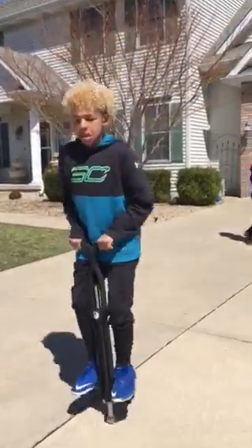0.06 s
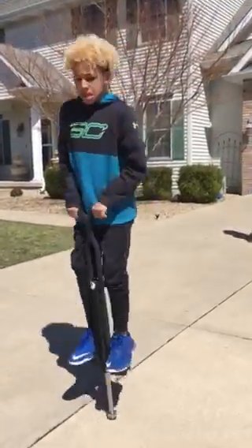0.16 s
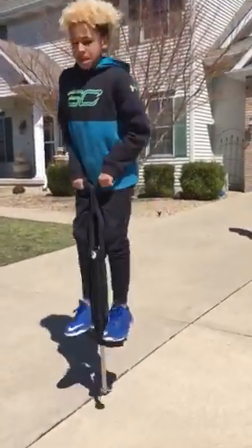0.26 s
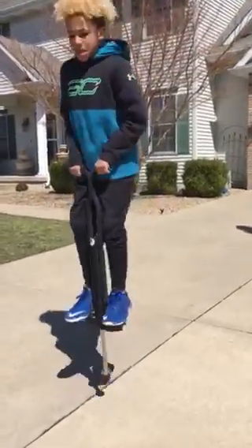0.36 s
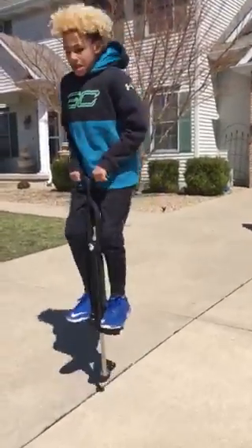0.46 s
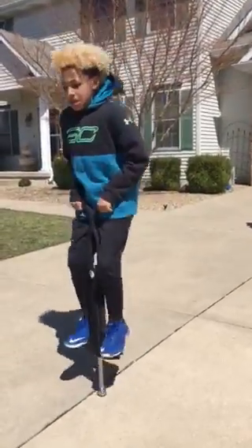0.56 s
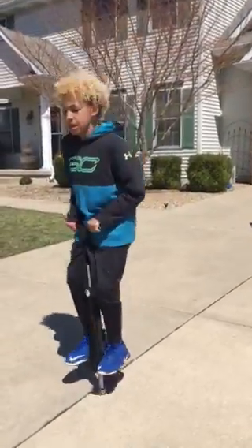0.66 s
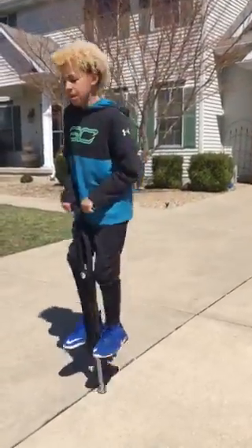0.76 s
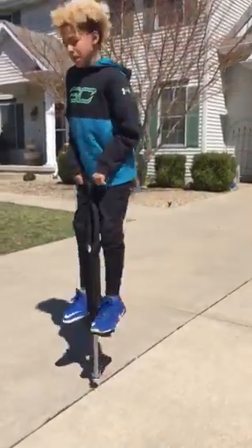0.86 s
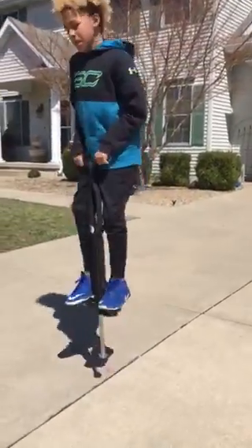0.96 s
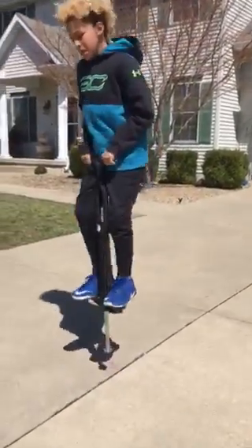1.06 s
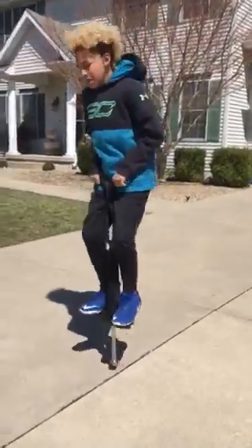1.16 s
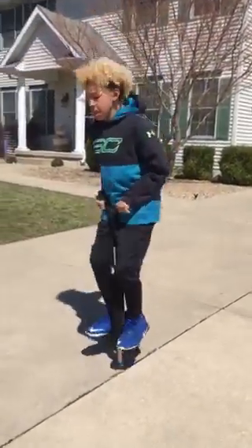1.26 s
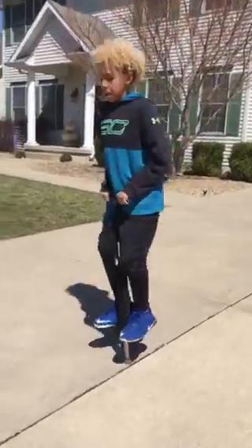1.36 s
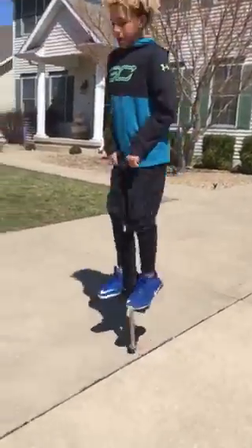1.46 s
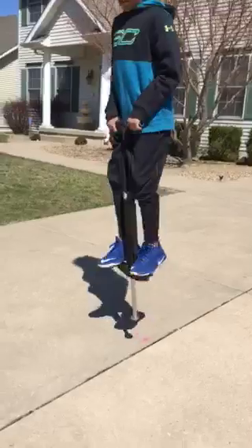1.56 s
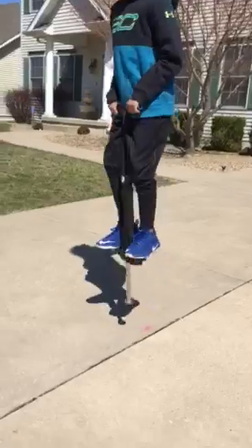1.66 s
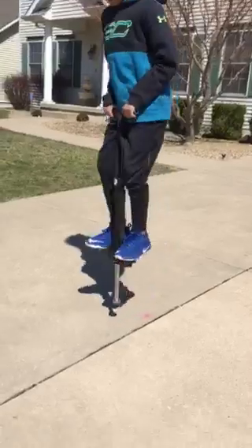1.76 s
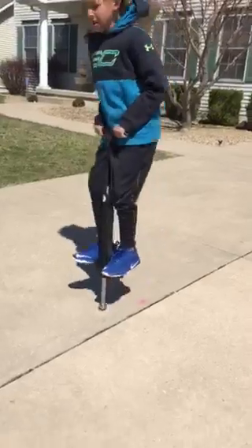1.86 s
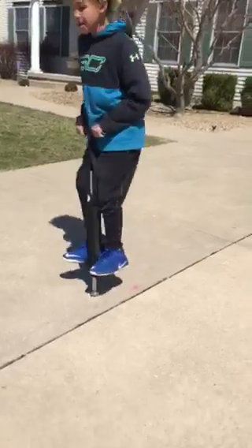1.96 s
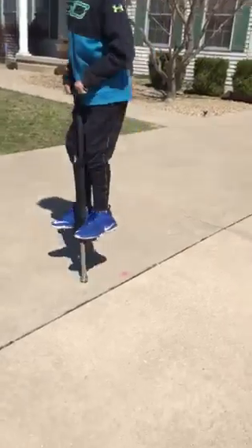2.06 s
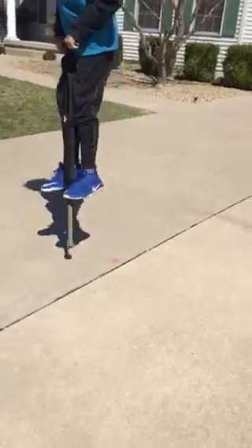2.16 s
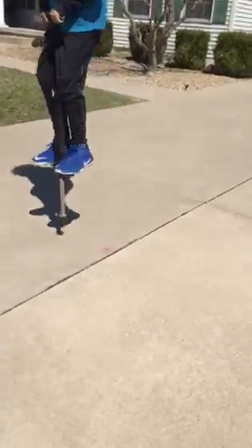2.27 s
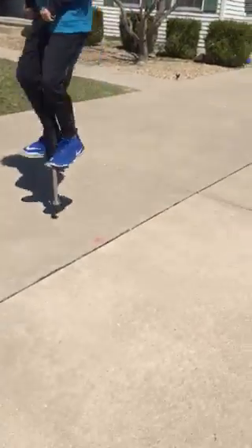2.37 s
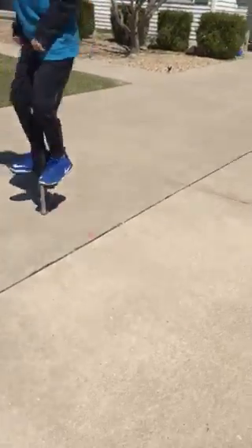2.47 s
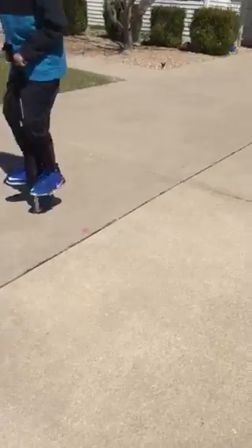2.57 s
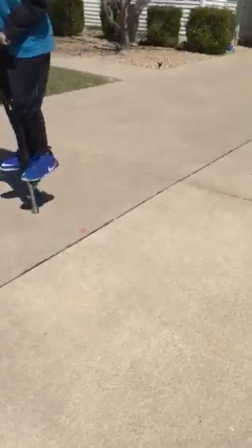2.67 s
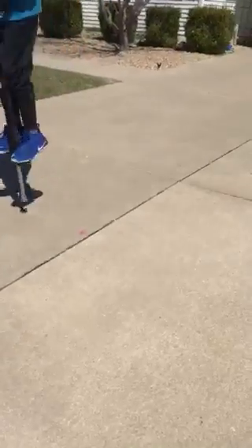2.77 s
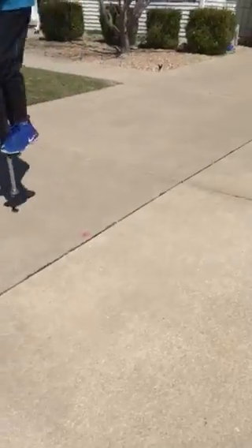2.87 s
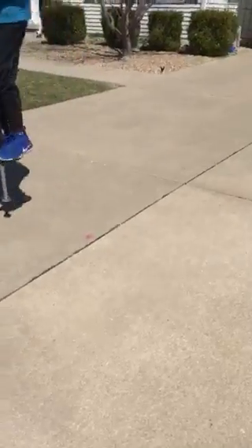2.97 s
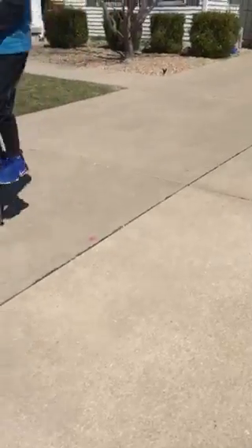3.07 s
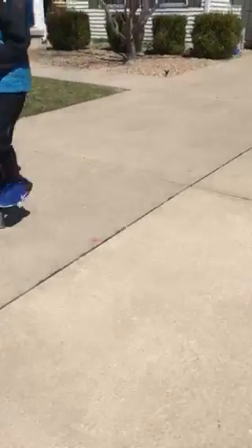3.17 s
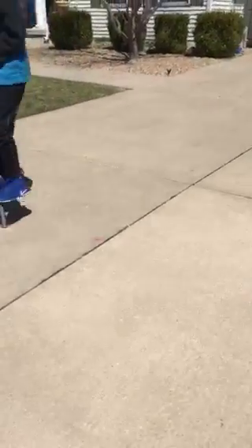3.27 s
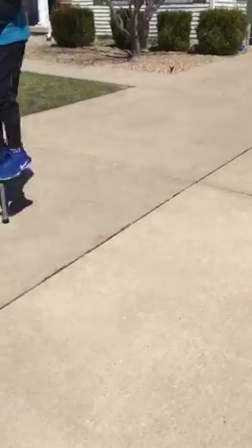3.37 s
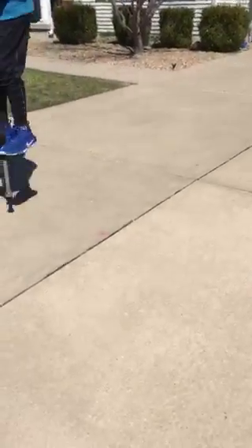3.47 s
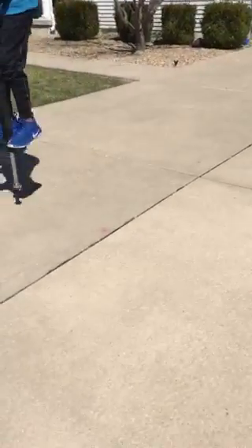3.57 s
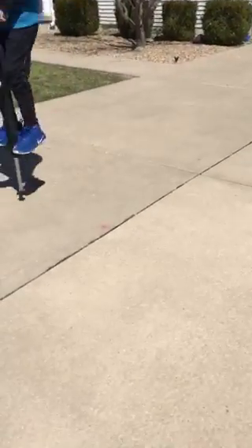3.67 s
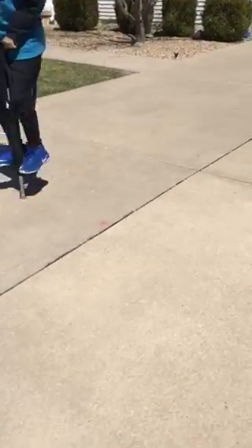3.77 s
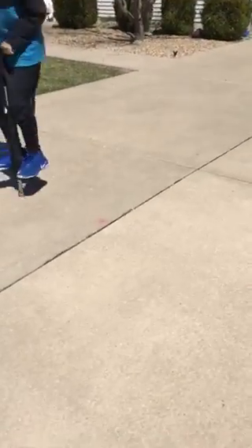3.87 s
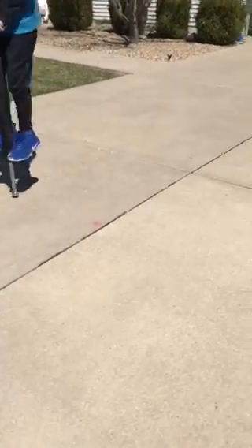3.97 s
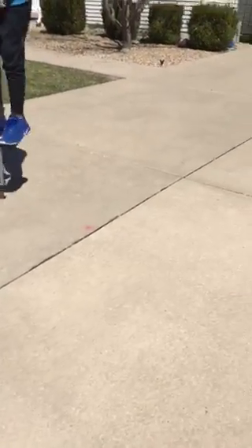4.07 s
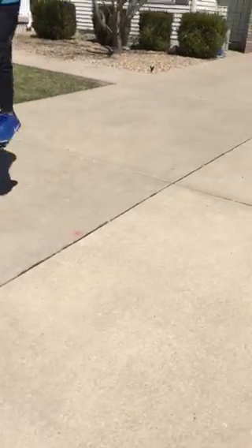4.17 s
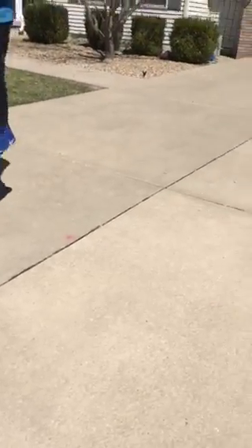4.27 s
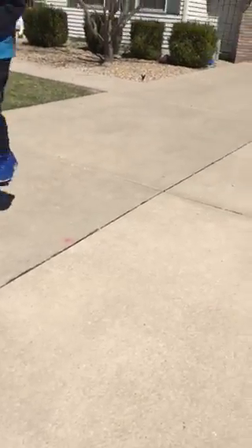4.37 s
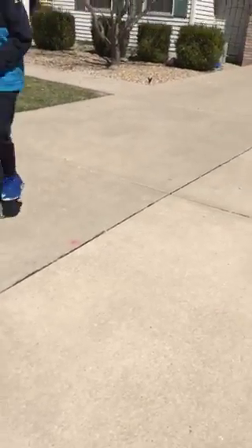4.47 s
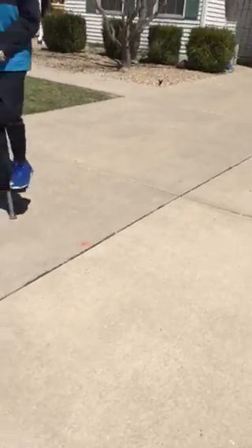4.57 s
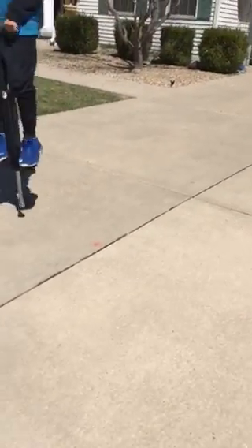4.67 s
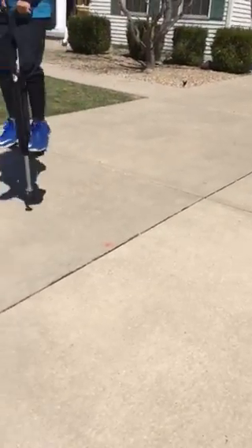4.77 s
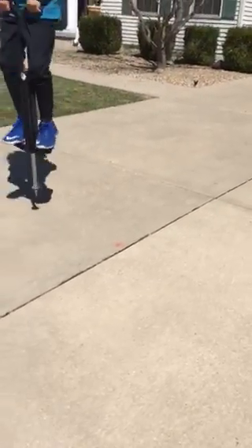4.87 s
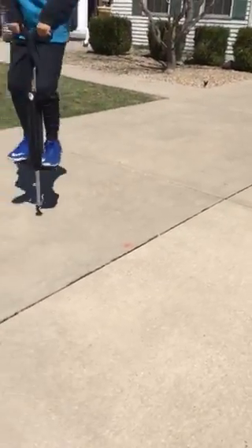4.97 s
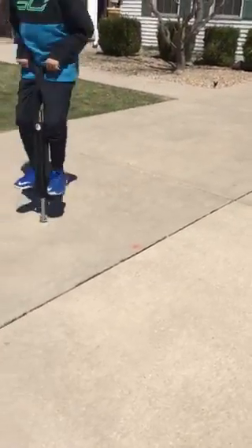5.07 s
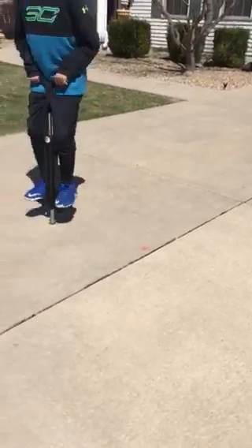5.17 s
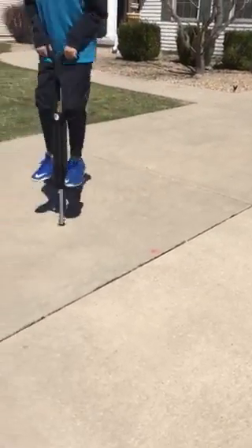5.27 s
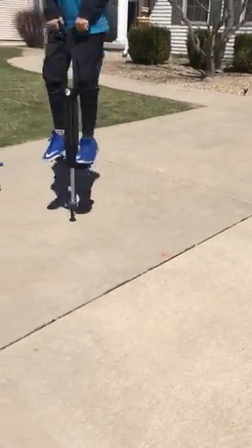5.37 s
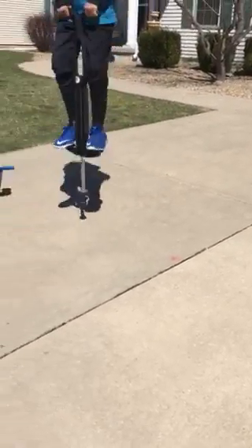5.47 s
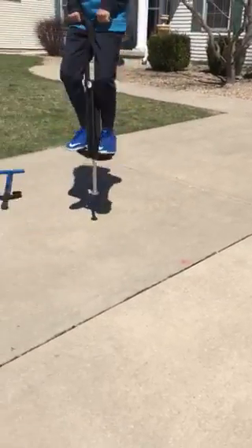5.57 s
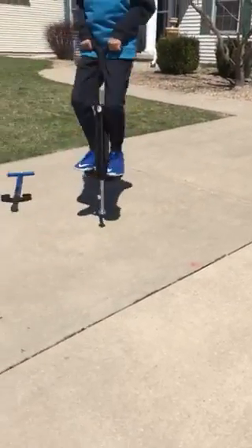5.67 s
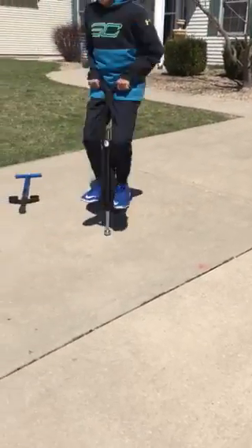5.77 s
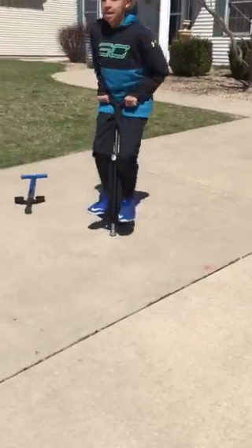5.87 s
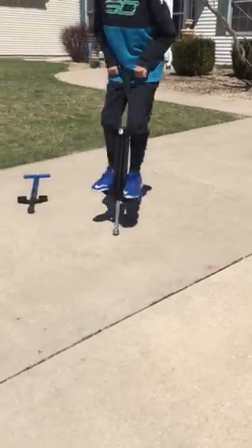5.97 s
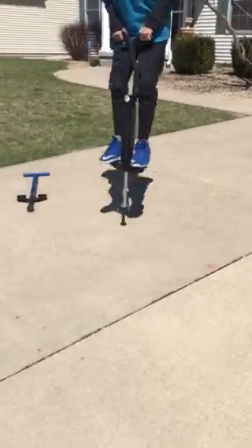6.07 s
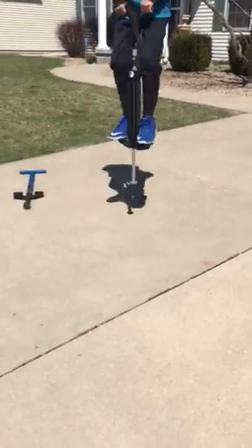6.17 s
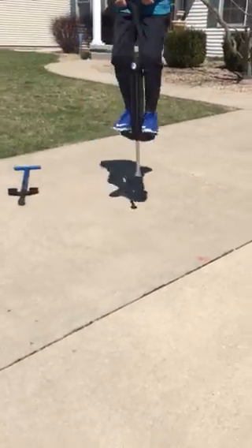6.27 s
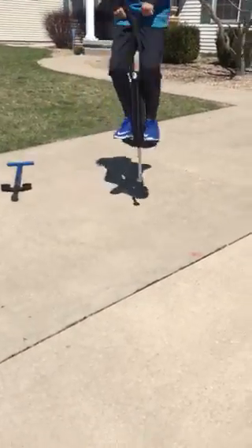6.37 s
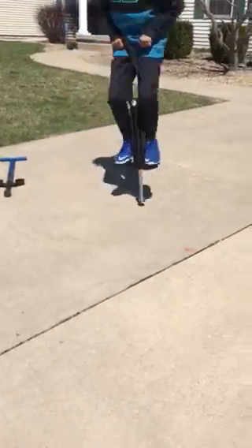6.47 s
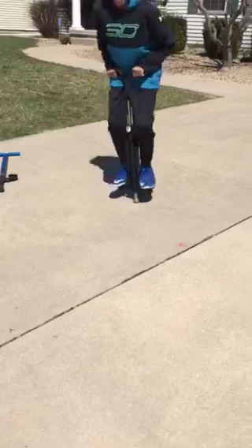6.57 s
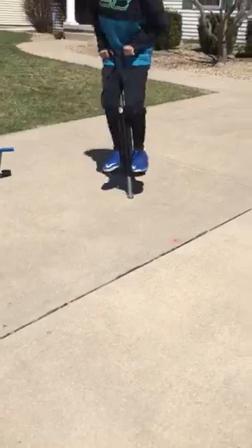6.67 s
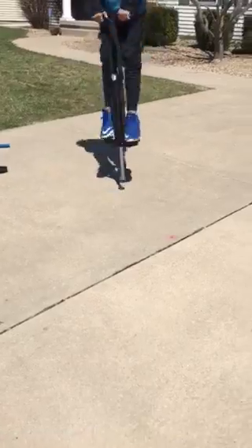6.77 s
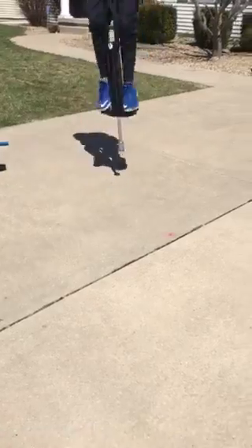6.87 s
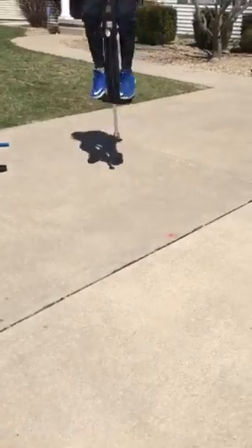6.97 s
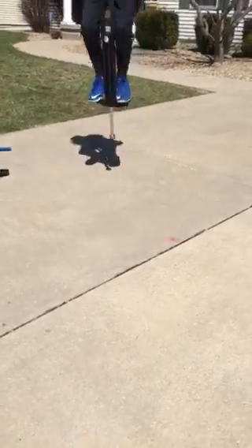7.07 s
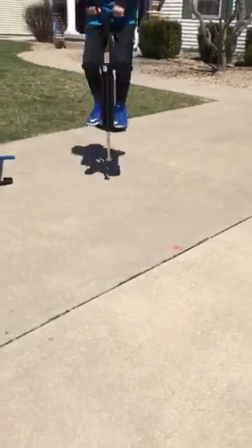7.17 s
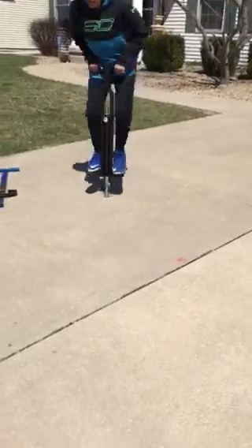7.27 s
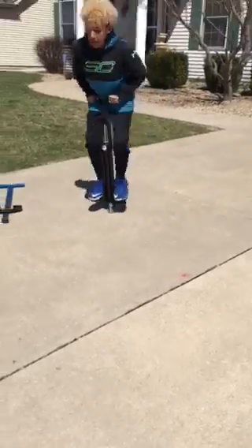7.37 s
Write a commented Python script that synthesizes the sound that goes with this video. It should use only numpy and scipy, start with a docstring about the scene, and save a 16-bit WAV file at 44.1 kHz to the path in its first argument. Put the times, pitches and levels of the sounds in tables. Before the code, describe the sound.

A pogo stick bounces steadily on concrete with thuds, spring scrapes and sharp clacks, while a ball bounces and wind buffets the microphone.

```python
"""First comes the thud of a pogo stick landing on a concrete drive, in a puff of wind. It keeps bouncing:
the rubber tip lands, the shaft scrapes down and up its tube, then clacks against the end stop.
A second stick rattles nearby, mostly early on. A ball slaps and booms, and small ticks dot the scene.
Wind buffets the microphone, the street murmurs far off and the houses throw the hits back."""
import sys
import numpy as np
from scipy import signal
from scipy.fft import rfft, irfft
from scipy.io import wavfile
from scipy.ndimage import uniform_filter1d

SR = 44100
rng = np.random.default_rng(int(sys.argv[2]) if len(sys.argv) > 2 else 0)


def unload_wav(signal):
    """Save mono or channel-first audio to the path in sys.argv[1] as 16-bit WAV at rate SR, clipped to [-1, 1]."""
    wavfile.write(
        sys.argv[1],
        SR,
        np.round(np.clip(np.atleast_2d(signal).T, -1, 1) * 32767).astype(np.int16),
    )


N = 327663

# A fade time (T60) is how long a sound takes to drop 60 dB. "Base" values are scaled or offset when used.
# how loud the distant street is: (time [s], level [dB])
STREET_LEVELS = [(0, -55), (3.4, -57.5), (5.8, -58.5), (7.43, -62)]
# tone of far-off sound: (frequency [Hz], level [dB])
DISTANT_TONE = [(150, -43), (250, -39), (528, -10.5), (845, -7), (938, -6), (1200, -3.5), (1350, -5),
                (1880, -10), (11700, -27), (16000, -61)]
# how loud the wind is: (time [s], level [dB])
WIND_LEVELS = [(0.0, -30.5), (0.27, -40.5), (1.03, -38.5), (1.36, -53), (1.61, -42.5), (1.86, -23.5),
               (2.13, -50), (2.29, -49.5), (2.54, -36), (2.96, -30.5), (3.35, -38.5), (3.72, -39),
               (4.1, -48.5), (4.45, -42.5), (4.95, -43), (5.6, -42), (6.56, -45.5), (6.73, -35.5),
               (6.87, -47.5), (7.43, -46.5)]
# tone of the wind: (frequency [Hz], level [dB])
WIND_TONE = [(15, -66), (30, -18), (50, -0.5), (75, 0), (120, -7), (200, -13.5), (280, -27.5), (600, -46),
             (1200, -93)]
# single puffs on the microphone: (time [s], level [dB], base pitch [Hz])
PUFFS = [(0.037, -29, 82), (0.183, -29.5, 152), (0.594, -32.5, 57), (1.094, -33, 103), (1.165, -29, 135),
         (1.199, -31.5, 107), (1.769, -38, 90), (1.95, -22.5, 79), (2.17, -34, 166), (2.336, -29.5, 65),
         (2.934, -25, 69.6), (3.038, -17.5, 83), (3.275, -36, 73.5), (3.5, -30.5, 108), (3.538, -30, 78.5),
         (4.696, -21, 112), (7.068, -38.5, 71.6), (7.249, -40, 66.6)]
# echoes off nearby walls: (delay [s], base level [dB])
WALL_ECHOES = [(.019, -25), (0.057, -14), (0.105, -20)]
# small ticks and knocks: (time [s], base level [dB], pitch [Hz])
SMALL_KNOCKS = [(0.035, -19, 1070), (0.047, -13.5, 3620), (0.147, -0.5, 3200), (0.182, -22, 1880),
                (0.461, -5, 4500), (0.476, -4, 3580), (0.721, 1.5, 3270), (1.042, -8.5, 330),
                (1.305, -31, 3570), (1.372, -4.5, 4900), (1.622, -34, 2040), (1.872, 1, 2180),
                (2.156, -36, 3090), (2.417, -25, 3720), (2.436, -3.5, 2400), (2.483, -23, 3000),
                (2.51, -19, 2500), (2.571, -16, 2960), (2.626, -9, 3600), (2.803, -11, 1080),
                (2.94, -21, 1900), (2.968, -5, 1840), (3.024, -16, 1900), (2.991, -36, 3000),
                (3.073, -28, 3800), (3.157, -24, 2500), (3.138, -5.5, 770), (3.323, -10, 3760),
                (3.899, -2, 2520), (4.009, -15.5, 860), (4.413, -18, 1460), (5.017, -21, 520),
                (5.017, -22, 9500), (5.09, -27, 1270), (5.263, -7, 877), (5.34, -13.5, 3440),
                (5.703, -24, 850), (5.736, -17.5, 653), (6.079, -10, 795), (7.172, -22, 1330),
                (7.351, -21.5, 350)]
# the ball lands: (time [s], base slap level [dB], boom level [dB], final boom pitch [Hz],
# base level of the sharp edge [dB re slap], hollow ring pitch [Hz], ring level [dB re slap])
BALL_BOUNCES = [(.857, -12, -20, 95.4, 1.5, 940, -1.5), (1.889, -17, -26.5, 73, -1.5, 1040, -8),
                (2.448, -25, -23, 70, -29, 1640, -19), (2.705, -14, -25.5, 90, -3, 1340, -5),
                (3.262, -15, -37, 78, -16, 820, -0.5), (3.6716, -13, -19, 99.7, -3.5, 1650, -20),
                (4.139, -14, -30.5, 84.3, -3, 913, -0.5), (4.603, -11.5, -22.5, 85.6, -9.5, 1240, -28),
                (4.988, -12.5, -20, 84.6, -11.5, 1530, -18), (5.403, -15, -19.5, 84, -5, 1780, -13),
                (5.793, -17.5, -20, 84.5, -12.5, 1618, -3), (6.204, -18.5, -17.5, 97, -27, 970, -2),
                (6.605, -19, -21, 72, -0.5, 1334, 2)]
# notes of the ball's skin: (pitch [Hz], level [dB], base fade time [s])
SKIN_NOTES = [(245, 4.5, 0.027), (372, -4, 0.046), (865, -1.5, 0.016), (1760, -11, 0.0063)]
# the second stick rattles: (time [s], base level [dB], wait before fading [s], fade time [s])
SECOND_RATTLES = [(0.459, -24.5, 0.041, 0.17), (0.864, -26.5, 0.0023, 0.12), (1.042, -29, 0.022, 0.23),
                  (1.281, -17, 0.0018, 0.054), (1.303, -29.5, 0.0024, 0.056), (1.602, -26, 0.0066, 0.29),
                  (1.871, -28.5, 0.0028, 0.21), (2.733, -29, 0.0018, 0.31), (2.95, -35.5, 0.029, 0.1),
                  (3.11, -42.5, 0.021, 0.6), (3.17, -24.5, 0.0018, 0.15), (3.413, -26.5, 0.011, 0.17),
                  (4.15, -50, 0.0018, 0.13), (4.225, -50.5, 0.0087, 0.82), (5.12, -49.5, 0.024, 0.19),
                  (5.62, -52, 0.074, 0.097), (6.3, -49.5, 0.11, 0.3), (7.35, -34.5, 0.0045, 0.067)]
# where its tube rings: (pitch [Hz], width [Hz], level [dB])
SECOND_TUBE = [(2120, 140, 14), (3200, 130, -10), (6360, 1100, 7), (8050, 300, -3), (9300, 1600, 5)]
# its loose steel part is knocked: (time [s], level [dB], fade time multiplier)
STEEL_PINGS = [(.147, -31, 0.42), (.297, -41, .7), (.46, -40, .8), (1.281, -37, .6), (1.885, -40, .4),
               (2.437, -45, .9), (2.741, -34, 0.5), (2.968, -42, 1.), (3.023, -44, 0.8), (3.073, -47, 0.6),
               (3.175, -25, 0.35)]
# notes of that part: (pitch [Hz], level [dB], base fade time [s])
STEEL_NOTES = [(1870, -5, .13), (5250, 0, 0.27), (9950, -5, 0.22)]
# tone of a shaft scraping: (frequency [Hz], level [dB])
SCRAPE_TONE = [(180, -11.5), (300, -6), (565, -16), (713, -4), (2700, -7), (3290, -4), (7570, -22.5),
               (12900, -10.5), (16000, -24)]
# where the main stick's tube rings: (pitch [Hz], width [Hz], level [dB])
MAIN_TUBE = [(2180, 470, -2), (3740, 1100, -1.5), (5630, 230, 0), (6340, 740, 0.5), (8250, 930, 0.5),
             (9610, 100, 6), (11180, 310, -1.5), (12670, 99, -12.5)]
# its main rings while the shaft rubs: (pitch [Hz], width [Hz], level [dB])
TUBE_HOWL = [(2180, 250, -6.5), (3415, 410, 2)]
# the tip lands: (time [s], base level [dB], thud [dB re base], upward scrape level [dB],
# clank [dB re base], thud pitch [Hz], clank pitch [Hz], howl [dB re scrape])
TIP_LANDINGS = [(0.0599, -10.5, -5.5, -33, -10.5, 168.4, 3600, -5),
                (0.6952, -11, -1, -32, -4.5, 168.4, 3250, -5),
                (1.327, -13, -10, -36.5, -3.5, 205, 3250, -5.5),
                (1.976, -11, -17, -32.5, -6, 247, 3380, -4.5),
                (2.5926, -14.5, -9.5, -37, 2, 142, 3200, -2.5),
                (3.2274, -13.5, -25, -42, -3, 167, 3340, -7),
                (3.867, -13.5, -15.5, -35.5, -11, 176, 2785, -6.5),
                (4.5031, -13, -10.5, -38, -5, 173, 4030, -10),
                (5.1688, -12.5, -7.5, -34, -5, 172, 3000, -22),
                (5.8745, -10.5, -8.5, -35, -9, 176, 2750, -23),
                (6.623, -10.5, -1.5, -36.5, -5, 169, 4000, -15),
                (7.389, -8.5, -6.5, -29, -14, 217, 2440, -23)]
# notes of the rubber tip: (multiple of the thud pitch, level [dB], fade time [s])
TIP_NOTES = [(1, -3, 0.094), (1.8, -11.5, 0.059), (4.2, -11, 0.0086)]
# the shaft hits the end stop: (time [s], base crack level [dB], jangle level [dB],
# clank [dB re crack], clank pitch [Hz])
STOP_CLACKS = [(0.2961, -17, -20, 4, 3240), (0.9319, -20, -21.5, 11, 3400),
               (1.5636, -21.5, -20, 11.5, 3380), (2.213, -15.5, -19.5, -2, 3740),
               (2.8286, -20.5, -23, 11, 3180), (3.473, -20, -23.5, 7, 3110),
               (4.0995, -23, -22.5, 12.5, 3200), (4.7409, -18, -21, 3.5, 3320),
               (5.4015, -20, -20.5, 7.5, 3270), (6.11, -9, -20, -5, 3010), (6.8534, -13.5, -19, -31, 3360)]
# notes of the frame; the third is its main ring: (pitch [Hz], level [dB], base fade time [s])
FRAME_NOTES = [(1140, -20.5, 0.081), (2385, -7, 0.029), (3420, 4, 0.018), (4460, -1, 0.016),
               (5310, -5.5, 0.024), (5870, 0.5, 0.0095), (7100, -5.5, 0.014), (7800, -13, 0.06),
               (9200, -11.5, 0.022)]
# the footrests jolt at the stop: (pitch [Hz], level [dB re jangle], base fade time [s])
FOOTREST_NOTES = [(324, -10.5, 0.054)]
# the freed spring hums on: (pitch [Hz], level [dB re jangle], base fade time [s])
SPRING_NOTES = [(1050, -35.5, 1), (1835, -22, 0.42)]

SQUEEZE_S, LONGEST_UP_S = 0.14, 0.15  # the shaft's trip down and its longest trip up
BITE_S, SCRAPE_DB = 0.0012, -12  # time for the tip to grip; downward scrape relative to the landing


def amp(db):
    """Turns decibels into a multiplier."""
    return 10 ** (np.asarray(db) / 20)


def evened(x):
    """Scales a signal to an average (rms) size of 1."""
    return x / np.sqrt(np.mean(x ** 2) + 1e-20)


def add(mix, s, sound):
    """Mixes a sound in, starting at s seconds."""
    part = mix[round(s * SR):][:len(sound)]
    part += sound[:len(part)]


def curve(rows):
    """Joins (time [s], level [dB]) points into a volume curve."""
    s, db = np.transpose(rows)
    return amp(np.interp(np.arange(N) / SR, s, db))


def shaped(x, tone):
    """Gives x a tone drawn as (frequency [Hz], level [dB]) points."""
    points_hz, db = np.transpose(tone)
    hz = np.fft.rfftfreq(len(x), 1 / SR)
    gain = amp(np.interp(np.log(hz + 1), np.log(points_hz + 1), db))
    return irfft(rfft(x) * gain, len(x))


def noise(tone, length=N):
    """Noise with the given tone."""
    return shaped(rng.standard_normal(length), tone)


def wobble(length, smooth):
    """A random wiggle; smoothing over more samples makes it slower."""
    return evened(uniform_filter1d(rng.standard_normal(length), smooth))


def patchy(x, db, bins, frames):
    """Turns random patches of pitch and time up or down, then evens the result."""
    spectrum = signal.stft(x, nperseg=256)[2]
    patches = rng.standard_normal(spectrum.T.shape).T
    patches = evened(uniform_filter1d(uniform_filter1d(patches, bins, 0), frames, 1))
    return evened(signal.istft(spectrum * amp(db * patches), nperseg=256)[1][:N])


def ring(x, peaks):
    """Lets x set a tube ringing at its own pitches."""
    return sum(amp(db) * signal.lfilter(*signal.iirpeak(hz, hz / width, SR), x) for hz, width, db in peaks)


def struck(notes, detune, stretch=0.95):
    """Fading notes, a little different at every blow; stretch multiplies their fade times."""
    t, luck = np.arange(SR // 2) / SR, rng.standard_normal((len(notes), 2))
    return sum(amp(db + 2 * a - 60 * t / (t60 * stretch)) * np.sin(2 * np.pi * hz * (1 + detune * b) * t)
               for (hz, db, t60), (a, b) in zip(notes, luck))


def snap(hz, cycles):
    """A very short click around one pitch."""
    t = np.arange(-40, 200) / SR
    return np.cos(2 * np.pi * hz * t) * np.exp(-(t * hz / cycles * np.where(t < 0, 2, 1)) ** 2)


def boom(hz, swell_s, uneven, squeeze, sag_s):
    """A lopsided push of air that swells, sags in pitch toward hz and dies."""
    t = np.arange(SR // 6) / SR
    pitch = hz * (1 + squeeze * np.exp(-t / sag_s) + uneven * wobble(len(t), 250))
    phase = 2 * np.pi * np.cumsum(pitch) / SR
    wave = np.sin(phase) + 0.3 * np.sin(2 * phase + 1)
    return wave * t / swell_s * np.exp(1 - t / swell_s)


def street():
    """A distant wash that drifts in tone, over the steady hiss of the microphone."""
    wash = patchy(noise(DISTANT_TONE), db=3, bins=8, frames=24) * curve(STREET_LEVELS)
    hiss = amp(-61) * evened(noise([(300, 12.5), (3000, -32), (15000, -12)]))
    return wash + hiss


def wind():
    """Air buffets the microphone: a lumpy rumble with a few clear puffs."""
    lumps = evened(uniform_filter1d(wobble(N, 1500), 1500))
    out = evened(noise(WIND_TONE) * amp(5.2 * lumps)) * curve(WIND_LEVELS)
    for s, db, hz in PUFFS:
        add(out, s, amp(db) * boom(0.65 * hz, swell_s=0.014, uneven=0.58, squeeze=0.907, sag_s=0.0196))
    return out


def far_houses(hits, rise_s=0.026, t60=0.99):
    """Distant walls return the hits as a dull haze of noise that swells and lingers."""
    t = np.arange(SR) / SR
    linger = ((1 - np.exp(-t / rise_s)) * amp(-60 * t / t60)) ** 2
    power = abs(signal.fftconvolve(shaped(hits, DISTANT_TONE) ** 2, linger / linger.sum())[:N])
    return amp(-15) * np.sqrt(power) * evened(noise(DISTANT_TONE))


def yard(hits, tail_t60=0.24, smear_t60=0.0062):
    """Nearby walls echo the hits, smeared by siding and shrubs, with a thin scattered tail."""
    t = np.arange(SR // 3) / SR
    scatter = rng.standard_normal(len(t)) * (rng.random(len(t)) < 0.05)
    scatter *= amp(-60 * t / tail_t60) * (t > 0.004)
    echoes = amp(-12) * scatter / np.linalg.norm(scatter)
    for s, db in WALL_ECHOES:
        add(echoes, s, amp(db - 60 * t[:800] / smear_t60) * rng.standard_normal(800) / 6)
    return shaped(signal.fftconvolve(hits, echoes)[:N], [(150, -9), (800, -4.5), (4000, -7), (14000, -13)])


def ticks(grit_per_s=12, grit_db=-51):
    """Small knocks and stray grit underfoot: each is a click with a puff of noise."""
    out, t = np.zeros(N), np.arange(1500) / SR
    fade = amp(-60 * t / 0.02) + amp(-3 - 60 * t / 0.085)
    luck = rng.random((round(grit_per_s * N / SR), 3))
    stray = [(when * N / SR, grit_db + 10 * size, 900 * 5 ** pitch) for when, size, pitch in luck]
    for s, db, hz in SMALL_KNOCKS + stray:
        add(out, s, amp(db - 16.5) * snap(hz, cycles=1.37))
        puff = noise([(hz / 4, -3), (hz, 0), (hz * 3, -5), (hz * 12, -30)], len(t))
        add(out, s, amp(db - 18) * fade * puff)
    return out


def ball():
    """The skin slaps the concrete and rings hollow, then the squeezed air booms."""
    out, t = np.zeros(N), np.arange(SR // 3) / SR
    edge = 0.16 * snap(2100, cycles=1) + 4.1 * snap(4700, cycles=0.58)
    slap_fade = amp(-60 * t / 0.014) + amp(-9.5 - 60 * t / 0.052)
    for s, db, boom_db, hz, edge_db, hollow_hz, hollow_db in BALL_BOUNCES:
        add(out, s, amp(db + hollow_db) * struck([(hollow_hz, 0, 0.014)], detune=0.014))
        add(out, s - 30 / SR, amp(db + edge_db) * edge)
        slap = noise([(300, -0.5), (1500, 13.5), (4000, -1.5), (12000, -14.5)], len(t))
        add(out, s, amp(db - 7) * slap_fade * slap)
        add(out, s, amp(db - 13.5) * struck(SKIN_NOTES, detune=0.089))
        dull_tail = evened(noise([(150, 4), (350, -8.5), (900, -3.5), (2500, -42)], len(t)))
        add(out, s, amp(db - 10.5 - 60 * t / 0.068) * dull_tail)
        air = boom(hz, swell_s=0.0068, uneven=0.27, squeeze=2.6, sag_s=0.006)
        add(out, s + 0.001, -amp(boom_db) * air)
    return out


def rubbing(per_s, spread_db):
    """Rubbing is a stream of tiny bumps of uneven size, in brief clumps."""
    sizes = amp(spread_db * np.minimum(rng.exponential(1, N), 5))
    bumps = sizes * (rng.random(N) < per_s / SR)
    clumps = amp(2.2 * wobble(N, 150))
    return evened(bumps * rng.choice([-1., 1.], N) * clumps)


def coils(count=30, per_s=700, low_hz=1200, high_hz=8500, t60=0.042):
    """Spring coils catch on the tube and ping, each at a sliding pitch of its own."""
    out, t = np.zeros(N), np.arange(2500) / SR
    catches = amp(4 * np.minimum(rng.exponential(1, N), 3)) * (rng.random(N) < per_s / SR)
    which = rng.integers(0, count, N)
    for coil, hz in enumerate(np.geomspace(low_hz, high_hz, count)):
        slide = t * (1 + 0.1 * rng.uniform(-0.77, 1) * t / t60)
        ping = amp(-60 * t / t60) * np.sin(2 * np.pi * hz * slide)
        out += signal.oaconvolve(catches * (which == coil), ping)[:N]
    return evened(out)


def sliding(tube, ring_db, per_s, spread_db):
    """Shaft and coils rub on a ringing tube; returns the low, middle and high parts of the sound."""
    rub = rubbing(per_s, spread_db)
    sound = evened(shaped(rub, SCRAPE_TONE)) + amp(ring_db) * evened(ring(rub, tube)) + amp(-2) * coils()
    sound = patchy(sound, db=2, bins=3, frames=6)  # each touching coil rings its own way for a moment
    low, below_high = (signal.sosfiltfilt(signal.butter(3, hz, fs=SR, output="sos"), sound)
                       for hz in (2000, 7000))
    return low, below_high - low, sound - below_high


def second_stick(chatter_db=2.5, chatter_s=0.0055):
    """A lighter, looser stick: its loose parts stutter and a steel piece pings."""
    low, middle, high = sliding(SECOND_TUBE, ring_db=-6, per_s=8000, spread_db=3.7)
    gain, t = np.zeros(N), np.arange(SR // 2) / SR
    for s, db, wait, t60 in SECOND_RATTLES:
        swell = np.minimum(0.48 + 0.3 * t / wait, 1)
        add(gain, s, swell * amp(db - 60 * np.maximum(t - wait, 0) / t60))
    out = (amp(-2) * low + middle + amp(-6) * high) * gain
    out *= amp(chatter_db * wobble(N, round(chatter_s * SR)))
    for s, db, stretch in STEEL_PINGS:
        buzz = 1 + 0.55 * wobble(len(t), 70)  # the piece chatters against its neighbour
        add(out, s, amp(db) * buzz * struck(STEEL_NOTES, detune=0.004, stretch=stretch))
    return out


def onset(length, rise_s):
    """A smooth rise from silence to full volume."""
    return 1 - np.exp(-(np.arange(length) / SR / rise_s) ** 2)


def strokes(power):
    """Yields each bounce's scrape volume: it follows shaft speed, which is zero at the bottom."""
    stops = [row[0] for row in STOP_CLACKS] + [N / SR + 1]
    for (s, db, _, up_db, *_), stop in zip(TIP_LANDINGS, stops):
        length_s = min(stop - s, SQUEEZE_S + LONGEST_UP_S)
        t = np.arange(round(length_s * SR)) / SR
        down = np.cos(np.pi / 2 * np.minimum(t / SQUEEZE_S, 1))
        up = np.sin(np.pi / 2 * np.clip((t - SQUEEZE_S) / (0.6 * (length_s - SQUEEZE_S)), 0, 1))
        yield amp(db + SCRAPE_DB) * onset(len(t), BITE_S) * down ** power + amp(up_db) * up ** power


def shaft_and_spring(base_t60=0.23):
    """The shaft scrapes down and up, and the spring jangles after each clack."""
    out, t = np.zeros(N), np.arange(SR // 2) / SR
    bands = sliding(MAIN_TUBE, ring_db=-2, per_s=7000, spread_db=1.5)
    powers, dampings = (1.6, 2.1, 2.7), (0.8, 1.05, 1.3)  # the treble needs speed, so it fades first
    scrape_trim_db, jangle_trim_db = (-0.5, 0, 0), (-5.2, 0, 0)
    for k, band in enumerate(bands):
        gain = np.zeros(N)
        for (s, *_), volume in zip(TIP_LANDINGS, strokes(powers[k])):
            add(gain, s, amp(scrape_trim_db[k]) * volume)
        for s, _, db, *_ in STOP_CLACKS:
            add(gain, s, amp(db + jangle_trim_db[k] - 60 * dampings[k] * t / base_t60))
        out += band * gain
    return out


def tube_howl():
    """The tube rings while the shaft rubs, louder the faster it slides."""
    howl = patchy(ring(rubbing(per_s=2500, spread_db=2.5), TUBE_HOWL), db=2.5, bins=3, frames=6)
    gain = np.zeros(N)
    for (s, *_, howl_db), volume in zip(TIP_LANDINGS, strokes(power=2)):
        add(gain, s, amp(howl_db) * volume)
    return howl * gain


def frame_notes(main_hz):
    """The frame's notes, with its main ring moved to main_hz."""
    return [(main_hz if k == 2 else hz, *rest) for k, (hz, *rest) in enumerate(FRAME_NOTES)]


def shaken_frame(hz, per_s=2700, t60=0.052):
    """Many quick little blows shake the loose frame and blur into one clank."""
    t = np.arange(SR // 10) / SR
    chance, size = rng.random((len(t), 2)).T
    blows = (chance < per_s / SR) * (2 * size - 1)
    blows *= amp(-60 * t / t60) * (1 - np.exp(-t / BITE_S))
    one_blow = struck(frame_notes(hz), detune=0.028, stretch=0.61)
    return signal.fftconvolve(blows / (np.linalg.norm(blows) + 1e-9), one_blow)


def end_stop():
    """The shaft cracks against its stop: the frame clanks, the footrests jolt, the spring hums."""
    out, t = np.zeros(N), np.arange(SR // 2) / SR
    rise = onset(len(t), 0.001)  # the stop gives way for a millisecond or two
    for s, db, jangle_db, clank_db, hz in STOP_CLACKS:
        add(out, s, amp(jangle_db) * struck(FOOTREST_NOTES + SPRING_NOTES, detune=0.0271))
        crack = rng.standard_normal(len(t)) * (amp(3.5 - 60 * t / 0.019) + amp(-23.5 - 60 * t / 0.041))
        clank = amp(clank_db) * struck(frame_notes(hz), detune=0.023)
        add(out, s, amp(db) * rise * (clank + crack))
    return out


def thud(hz, squash=0.87, squash_s=0.003):
    """The rubber tip squashes: its knock starts high and sags to hz."""
    t = np.arange(SR // 5) / SR
    sag = t + squash * squash_s * (1 - np.exp(-t / squash_s))
    return -sum(amp(db - 60 * t / t60) * np.sin(2 * np.pi * k * hz * sag) for k, db, t60 in TIP_NOTES)


def landings():
    """The tip thuds and smacks on the concrete, shaking the frame."""
    out, t = np.zeros(N), np.arange(SR // 2) / SR
    smack_volume = amp(-19.5 - 60 * t / 0.19) * onset(len(t), BITE_S)
    for s, db, thud_db, _, clank_db, thud_hz, clank_hz, _ in TIP_LANDINGS:
        add(out, s, amp(db + thud_db) * thud(thud_hz))
        add(out, s, amp(db) * smack_volume * rng.standard_normal(len(t)))
        add(out, s, amp(db + clank_db) * shaken_frame(clank_hz))
    return out


def scene():
    """Mixes the hits, their echoes, the wind and the street into one channel."""
    main_stick = shaft_and_spring() + tube_howl() + landings() + end_stop()
    hits = main_stick + second_stick() + ball() + ticks()
    return (hits + yard(hits) + far_houses(hits) + wind() + street())[None]


def record(dry, low_hz=31.7, high_hz=15900):
    """Trims the deepest bass, rounds off loud peaks and cuts the highest treble."""
    thinned = signal.sosfilt(signal.butter(2, low_hz, "high", fs=SR, output="sos"), dry)
    rounded = 0.75 * np.tanh(thinned / 0.75)
    treble_cut = signal.firwin(511, high_hz, window=("kaiser", 9), fs=SR)
    return signal.oaconvolve(rounded, treble_cut[None], "same")


dry = scene()
out = record(dry)
unload_wav(out)
```